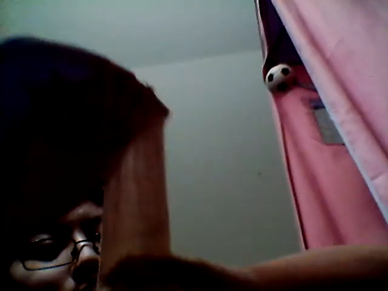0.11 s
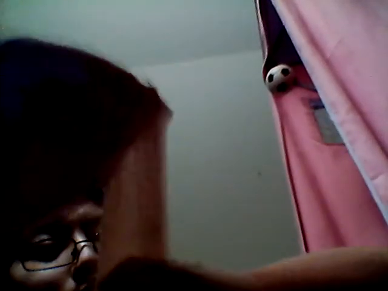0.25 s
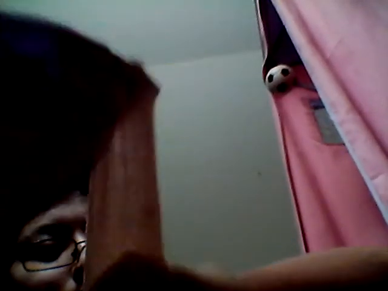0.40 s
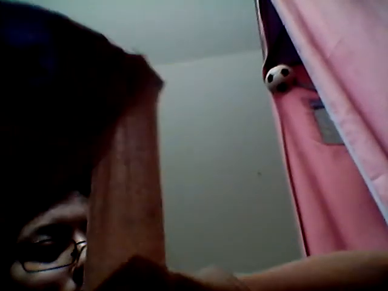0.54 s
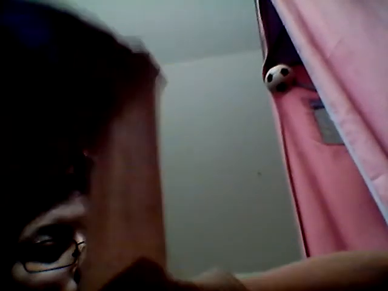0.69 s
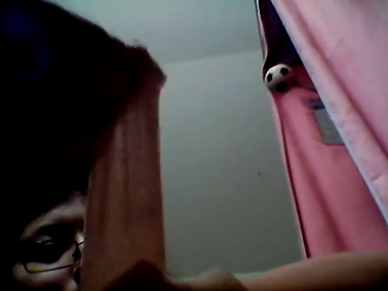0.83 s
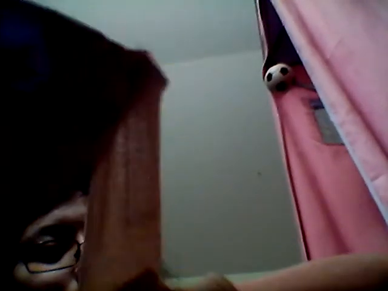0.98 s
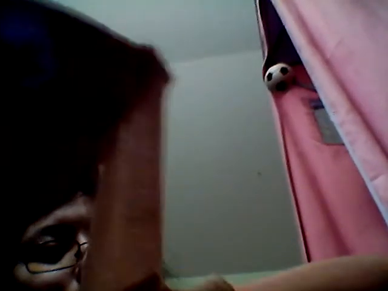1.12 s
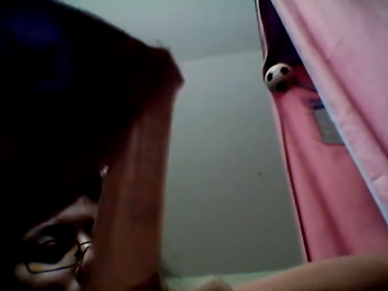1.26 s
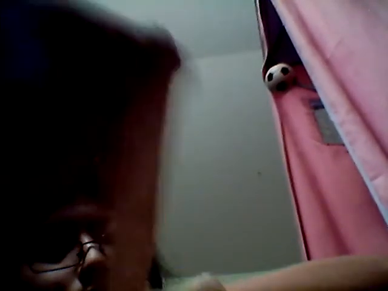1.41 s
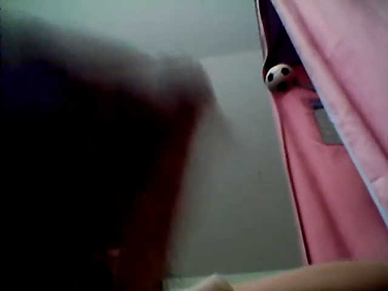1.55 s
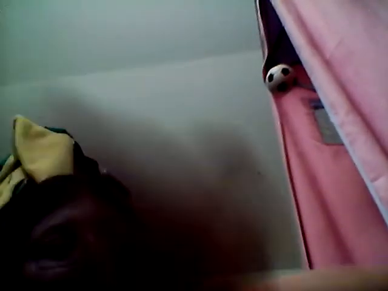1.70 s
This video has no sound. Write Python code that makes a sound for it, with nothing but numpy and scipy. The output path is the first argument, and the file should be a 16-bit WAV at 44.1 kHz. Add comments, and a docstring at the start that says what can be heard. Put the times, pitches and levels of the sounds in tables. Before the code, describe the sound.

A fabric covering on a forearm rustles, first crinkling softly, then rubbed and tugged in short, crackly, scraping strokes. Creases tick and snap, and the later tugs thump softly. A small microphone is close by in a room with faint hiss.

```python
"""Soft crinkling over faint hiss, then short strokes: a covering on a forearm is rubbed and tugged.
Its fibres catch and slip in dense crackle; firmer strokes add coarse scrape and low fabric flutter.
Creases tick between strokes and snap during them, taut folds rasp, and later tugs thump.
A brief low hum sags early on. A small microphone, close by in a room, rings near 5 kHz."""
import sys
import numpy as np
from scipy import signal
from scipy.io import wavfile
from scipy.ndimage import uniform_filter1d

SR = 44100
rng = np.random.default_rng(int(sys.argv[2]) if len(sys.argv) > 2 else 0)


def persist_wave(psi):
    """Save psi, clipped to +-1, as 16-bit WAV."""
    counts = np.round(np.clip(psi, -1, 1) * 32767).astype(np.int16)
    wavfile.write(sys.argv[1], SR, np.atleast_2d(counts).T)


N = 79380
TIME = np.arange(N) / SR

# Spectra with the microphone's ring. Each row: frequency in Hz, relative level in dB.
CRINKLE_SPECTRUM = [(150, -47), (600, -35), (1500, -24), (3000, -24), (4000, -12), (4900, -2), (5600, 2.5),
                    (6250, -6.5), (6900, -24.5), (8000, -46), (9300, -29.5), (10400, -31.5), (11700, -47),
                    (15800, -58)]
CRACKLE_SPECTRUM = [(150, -31), (600, -33), (1500, -20.5), (3000, -17), (4000, -9.5), (4900, -0.5),
                    (5600, 3.5), (6250, -5.5), (6900, -20.5), (8000, -39), (9300, -28.5), (10400, -24),
                    (11700, -46.5), (13200, -52), (15800, -46)]


def amp(db):
    """Decibels to gain."""
    return 10 ** (np.asarray(db) / 20)


def unit(x):
    """Scale to rms 1."""
    return x / np.sqrt(np.mean(x ** 2) + 1e-20)


def steady(x, window_samples):
    """Hold the rms near 1 over a sliding window."""
    power = uniform_filter1d(uniform_filter1d(x ** 2, window_samples), window_samples)
    return x / np.sqrt(abs(power) + 1e-12)


def envelope(times_s, levels_db):
    """Gain along a level curve, silent outside it."""
    return amp(np.interp(TIME, times_s, levels_db, left=-120, right=-120))


def colour(x, spectrum, band_hz=(0, SR)):
    """Minimum-phase filter; unit white noise comes out with rms 1 inside the band."""
    hz = np.fft.rfftfreq(4096, 1 / SR)
    points_hz, points_db = np.transpose(spectrum)
    gain = amp(np.interp(np.log(hz + 1), np.log(points_hz + 1), points_db))
    gain /= np.sqrt(np.mean(gain ** 2 * (hz >= band_hz[0]) * (hz <= band_hz[1])))
    log_gain = np.log(np.r_[gain, gain[-2:0:-1]])
    impulse = np.fft.ifft(np.exp(np.conj(signal.hilbert(log_gain)))).real
    return signal.oaconvolve(x, impulse[:len(hz)])[:N]


def slips(rate_per_s, spread_db, smooth_gain):
    """Fibres catch and let go: random clicks, a few large, over smooth rubbing."""
    sizes = amp(spread_db * np.minimum(rng.exponential(1, N), 4))
    clicks = sizes * rng.choice([-1, 1], N) * (rng.random(N) < rate_per_s / SR)
    return steady(unit(clicks) + smooth_gain * rng.standard_normal(N), window_samples=600)


def creases(events, spectrum, decay_s, rise_s=0.0002):
    """Each crease gives way in a burst of slips a millisecond or two long."""
    t = TIME[:300]
    shape = (1 - np.exp(-(t + 1 / SR) / rise_s)) * np.exp(-t / decay_s)
    out = np.zeros(2 * N)
    for start_s, peak_db in events:
        burst = colour(rng.standard_normal(len(t)) * shape, spectrum)
        out[round(start_s * SR):][:len(burst)] += amp(peak_db) * burst / abs(burst).max()
    return out[:N]


def slide():
    """The covering barely moves and crinkles softly."""
    # Sliding strength. Each row: time in seconds, relative level in dB.
    curve = [(0, -66), (.13, -59), (.17, -49), (.33, -57.5), (.38, -51.5), (0.442, -39.5), (.48, -49.5),
             (.62, -72), (.79, -51.5), (.84, -50), (.97, -80), (1.0, -69), (1.038, -45), (1.1, -51.5),
             (1.25, -58), (1.5, -66), (1.66, -73), (1.8, -70)]
    friction = slips(rate_per_s=900, spread_db=4.5, smooth_gain=0.083)
    return amp(-5) * colour(friction * envelope(*np.transpose(curve)), CRINKLE_SPECTRUM)


def hiss():
    """Faint, steady background noise."""
    # Noise floor. Each row: frequency in Hz, relative level in dB.
    spectrum = [(20, -41), (50, -2), (100, -1), (170, 1.5), (260, -5.5), (400, -9.5), (1000, -14),
                (1600, -16.5), (3000, -22), (4200, -17), (5400, -11), (6200, -20), (7200, -29), (8500, -35),
                (10500, -31), (15800, -47)]
    return amp(-67) * colour(rng.standard_normal(N), spectrum)


def ticks():
    """Small creases give way, mostly between strokes."""
    # Each row: start in seconds, relative peak in dB.
    small_creases = [(0.0733, -39.5), (0.0777, -41), (0.0816, -33.5), (0.1582, -32), (0.1593, -26.5),
                     (0.1708, -35), (0.2004, -38), (0.2026, -31.5), (0.3517, -32), (0.378, -40),
                     (0.396, -31), (0.4249, -33), (0.4382, -32), (0.4456, -33), (0.4592, -26),
                     (0.4663, -32.5), (0.5927, -33), (0.6086, -28.5), (0.6377, -40), (0.7569, -35),
                     (0.7768, -35.5), (0.7886, -39), (0.7964, -32.5), (0.8004, -55), (0.9643, -29),
                     (0.9786, -36.5), (1.0224, -37), (1.0284, -30), (1.0673, -30), (1.072, -37.5),
                     (1.0919, -32), (1.2116, -27.5), (1.2524, -35.5), (1.272, -34), (1.318, -25),
                     (1.3356, -36), (1.3682, -28), (1.4612, -25), (1.502, -30), (1.6753, -50.5),
                     (1.7767, -47.5), (1.7934, -35)]
    return amp(-2.5) * creases(small_creases, CRINKLE_SPECTRUM, decay_s=0.0014)


def strokes():
    """Rubbing drives bright crackle, coarse scrape and a low flutter of the fabric."""
    # One list per stroke. Each row: time in seconds, relative crackle, scrape and flutter levels in dB.
    stroke_curves = [
        [(0.2, -49, -85, -84), (0.212, -48.5, -74, -87), (0.22, -50, -79, -79), (0.232, -37.5, -60, -65),
         (0.242, -41.5, -63.5, -69), (0.272, -36, -48, -53), (0.286, -43.5, -56.5, -56),
         (0.326, -58.5, -69.5, -63), (0.34, -77, -90, -59)],
        [(0.475, -79, -81, -66), (0.497, -32, -48, -65), (0.525, -32, -40.5, -48.5), (0.531, -31.5, -48, -70),
         (0.549, -31, -46.5, -56), (0.557, -35.5, -47.5, -54), (0.567, -35, -39.5, -54),
         (0.577, -36, -53.5, -51), (0.63, -58, -67, -65)],
        [(0.63, -52, -75, -71), (0.648, -44.5, -66, -68), (0.664, -32, -42.5, -43), (0.684, -38.5, -57.5, -55),
         (0.692, -44, -38, -66), (0.704, -38.5, -62.5, -57), (0.716, -35.5, -51, -53), (0.738, -42, -60.5, -57),
         (0.77, -83, -68, -78)],
        [(0.77, -59, -61, -74), (0.778, -57, -82, -84), (0.796, -49, -59.5, -87), (0.802, -50, -74, -72),
         (0.81, -50, -72, -71), (0.816, -52, -64, -75), (0.828, -60, -70, -73), (0.84, -59, -80, -84)],
        [(0.84, -61, -65, -84), (0.864, -38, -57, -87), (0.882, -39.5, -56, -73), (0.892, -38, -37, -50),
         (0.9, -41.5, -54.5, -43), (0.914, -30, -42.5, -45.5), (0.946, -35, -46, -40.5), (0.982, -75, -69, -78),
         (0.99, -84, -67, -54)],
        [(1.11, -66, -80, -84), (1.136, -27, -47, -58), (1.152, -48, -58.5, -67), (1.166, -38.5, -56, -51.5),
         (1.178, -28.5, -36, -35), (1.192, -32, -50, -43.5), (1.218, -51.5, -60, -52), (1.24, -71, -65.5, -72),
         (1.25, -69, -62, -55)],
        [(1.26, -72, -63, -60), (1.272, -42, -68, -78), (1.28, -43, -66, -63), (1.292, -29, -40, -37),
         (1.3, -29.5, -37.5, -26), (1.318, -43, -57, -65), (1.334, -44, -57.5, -62), (1.36, -94, -60.5, -62)],
        [(1.375, -61, -60, -74), (1.379, -51, -65, -65), (1.391, -35.5, -50.5, -52), (1.405, -42, -58, -62),
         (1.417, -34.5, -40, -41), (1.427, -36.5, -61, -37.5), (1.439, -34.5, -46.5, -50),
         (1.459, -44, -60.5, -52.5), (1.5, -48, -54, -62)],
        [(1.5, -54.5, -63, -58), (1.522, -35, -47, -55), (1.538, -28, -39.5, -34), (1.57, -29.5, -37, -31.5),
         (1.578, -30.5, -46, -47), (1.588, -28, -33.5, -32.5), (1.612, -32, -45.5, -36.5),
         (1.622, -81, -61, -47), (1.66, -90, -66.5, -63)],
    ]
    # Fabric spectra. Each row: frequency in Hz, relative level in dB.
    scrape_spectrum = [(100, -26.5), (220, -5), (350, -0.5), (520, 2.5), (950, 1), (1500, -0.5),
                       (2500, -3.5), (4000, -8.5), (7500, -29), (11000, -27.5), (15500, -41)]
    flutter_spectrum = [(20, -32), (42, -27), (65, -13.5), (95, -1), (135, -0.5), (180, -1.5), (240, -10),
                        (340, -26), (800, -46), (3000, -48.5)]
    crackle_gain, scrape_gain, flutter_gain = np.zeros((3, N))
    for curve in stroke_curves:
        times_s, crackle_db, scrape_db, flutter_db = np.transpose(curve)
        crackle_gain += envelope(times_s, crackle_db)
        scrape_gain += envelope(times_s, scrape_db)
        flutter_gain += envelope(times_s, flutter_db)
    fine = slips(rate_per_s=1800, spread_db=3.5, smooth_gain=0.21)
    rough = slips(rate_per_s=1500, spread_db=4, smooth_gain=0.28)
    crackle = colour(fine * crackle_gain, CRACKLE_SPECTRUM, band_hz=(3500, 7000))
    scrape = colour(rough * scrape_gain, scrape_spectrum, band_hz=(350, 2500))
    flutter = flutter_gain * steady(colour(rng.standard_normal(N), flutter_spectrum), window_samples=700)
    return amp(-2.5) * (crackle + scrape) + amp(-2) * flutter


def hum(waver_depth=0.27):
    """A soft low tone wavers and sinks in pitch."""
    # Each row: time in seconds, pitch in Hz, level in dB.
    tone_curve = [(.21, 185.9, -84), (.25, 182.2, -66.5), (0.289, 172.4, -55), (.34, 191.3, -64),
                  (.41, 171.7, -63), (.45, 158, -66), (.49, 149, -61), (.6, 154, -71), (0.678, 149.7, -74),
                  (.75, 152, -77)]
    times_s, pitch_hz, level_db = np.transpose(tone_curve)
    lowpass = signal.butter(2, 35, fs=SR, output="sos")
    waver = unit(signal.sosfilt(lowpass, rng.standard_normal((2, N))))
    phase = 2 * np.pi * np.cumsum(np.interp(TIME, times_s, pitch_hz)) / SR
    tone = np.exp(1j * phase) * (1 + waver_depth * (waver[0] + 1j * waver[1]))
    return np.sqrt(2) * tone.real * envelope(times_s, level_db)


def folds(pole_width_hz=210):
    """Friction briefly excites the broad resonance of each taut fold."""
    # Each row: start in seconds, length in seconds, pitch in Hz, level in dB.
    rasps = [(0.223, 0.023, 573, -60), (.262, .025, 520, -56), (0.5, 0.038, 1030, -47.5),
             (0.507, 0.037, 582, -47.5), (0.649, 0.039, 404, -58), (0.891, 0.0087, 405, -40),
             (1.13, 0.017, 2180, -50), (1.179, 0.0073, 710, -43.5), (1.291, 0.0072, 1150, -37),
             (1.434, 0.015, 1540, -46), (1.579, 0.016, 905, -39.5)]
    radius = np.exp(-np.pi * pole_width_hz / SR)
    out = np.zeros(N)
    for start_s, length_s, pitch_hz, level_db in rasps:
        pole = radius * np.exp(2j * np.pi * pitch_hz / SR)
        rasp = signal.lfilter([1], np.poly([pole, pole]), rng.standard_normal(N)).real
        swell = np.sin(np.pi * np.clip((TIME - start_s) / length_s, 0, 1))
        out += amp(level_db) * steady(rasp, window_samples=300) * swell
    return out


def snaps():
    """Creases give way sharply during strokes."""
    # Each row: start in seconds, relative peak in dB.
    loud_creases = [(0.2286, -26.5), (0.2683, -22), (0.4936, -25), (0.5058, -33), (0.5208, -16.5),
                    (0.5491, -19.5), (0.6634, -30), (0.6676, -25), (0.6906, -19.5), (0.7112, -28),
                    (0.8605, -32.5), (0.8888, -28), (0.9157, -13.5), (1.1336, -22), (1.1767, -33),
                    (1.289, -20.5), (1.3024, -20), (1.3886, -26), (1.4164, -19), (1.4685, -22),
                    (1.5267, -19.5), (1.5639, -13.5), (1.5864, -17)]
    return amp(-2.5) * creases(loud_creases, CRACKLE_SPECTRUM, decay_s=0.001)


def thumps(pitch_hz=106.7, rise_s=0.0013, t60_s=0.042, low_cut_hz=69):
    """Tugged fabric pushes the air and springs back; the microphone drops the deepest bass."""
    # Each row: start in seconds, relative level in dB.
    tugs = [(.905, -37.5), (1.177, -30), (1.2948, -27.5), (1.587, -22), (1.597, -24), (1.608, -28.5)]
    out = np.zeros(N)
    for start_s, level_db in tugs:
        t = np.maximum(TIME - start_s, 0)
        shape = amp(level_db - 60 * t / t60_s) * (1 - np.exp(-t / rise_s))
        out += shape * np.sin(2 * np.pi * pitch_hz * t)
    return signal.sosfilt(signal.butter(4, low_cut_hz, "high", fs=SR, output="sos"), out)


def room(x, t60_s=0.22, tail_db=-22, echoes_per_s=3000, gap_s=0.003):
    """Add a weak, short tail of sparse reflections."""
    t = TIME[:SR // 2]
    echoes = rng.standard_normal(len(t)) * (rng.random(len(t)) < echoes_per_s / SR)
    tail = echoes * (t > gap_s) * amp(-60 * t / t60_s)
    return x + amp(tail_db) * signal.oaconvolve(x, tail / np.linalg.norm(tail))[:N]


def scene():
    """The covering in its room, plus hum and hiss; mono."""
    background = hiss()
    covering = snaps() + ticks() + strokes() + slide() + folds() + thumps()
    return (room(covering) + hum() + background)[None]


def record(dry):
    """Steep low-pass on the top treble."""
    cutoff_hz = 15900
    lowpass = signal.firwin(511, cutoff_hz, window=("kaiser", 9), fs=SR)
    return signal.oaconvolve(dry, lowpass[None], "same")


dry = scene()
out = record(dry)
persist_wave(out)
```